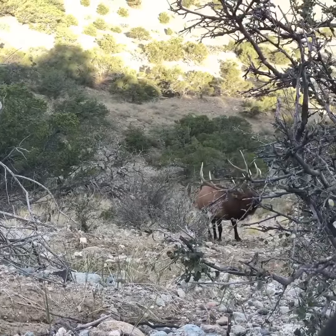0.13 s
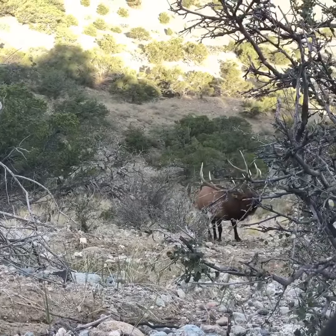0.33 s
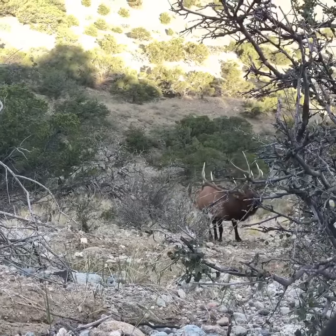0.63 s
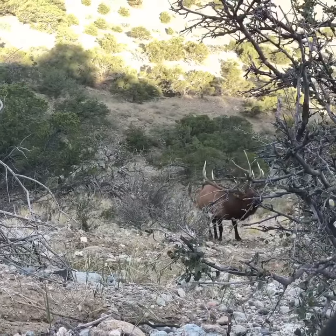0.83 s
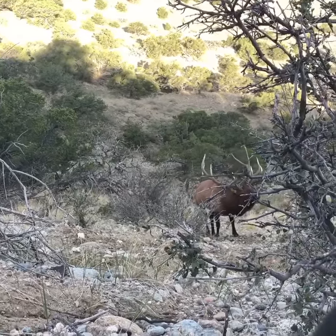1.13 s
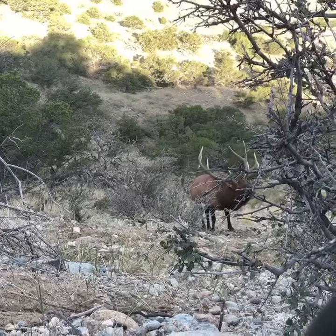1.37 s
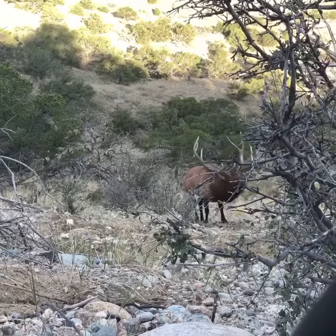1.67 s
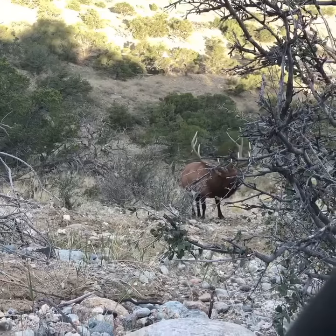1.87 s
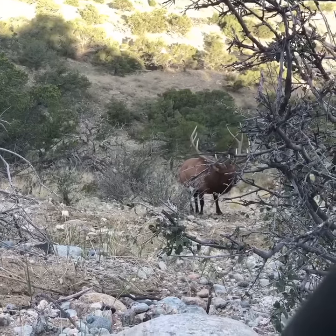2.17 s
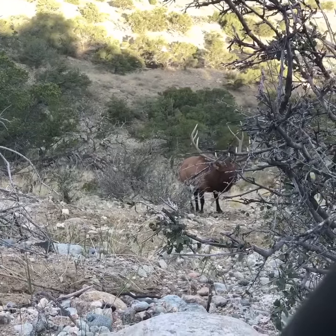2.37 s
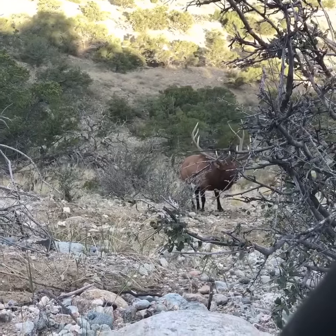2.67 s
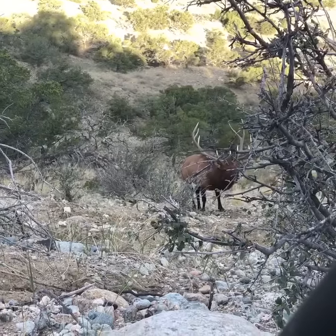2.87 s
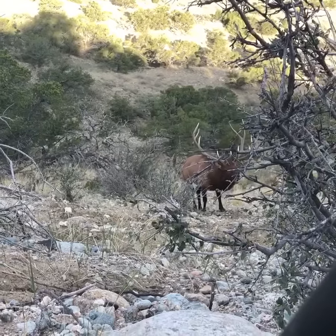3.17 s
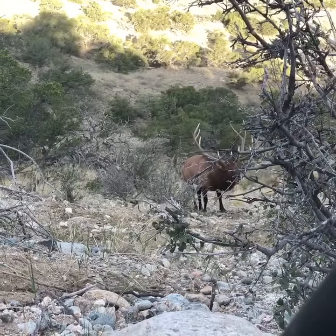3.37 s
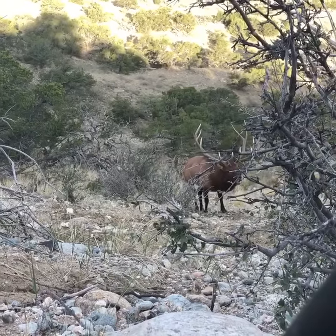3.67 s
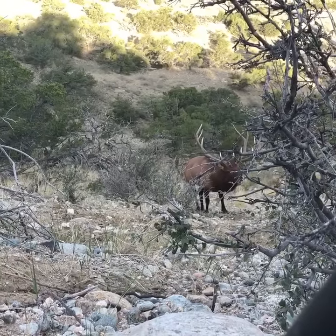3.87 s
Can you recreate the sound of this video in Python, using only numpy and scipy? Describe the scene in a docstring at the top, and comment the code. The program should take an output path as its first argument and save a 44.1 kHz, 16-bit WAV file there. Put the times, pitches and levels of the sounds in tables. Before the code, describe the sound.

Outdoors, the shrill bugle of a bull elk falls steeply into a low, breathy grunt and echoes faintly off the hillsides. Afterwards only light wind rumble on the microphone and small ticks and rustles remain.

```python
"""On a brushy slope, a bull elk ends his bugle. Two whistles sound together, mix into sum and
difference tones and plunge in pitch, while a low, hoarse grunt of throat pulses and breath comes
up under them. The hillsides answer with faint echoes. Then only puffs of wind on the microphone,
a few small ticks and rustles and the quiet air are left."""
import sys
import numpy as np
from scipy import signal
from scipy.fft import rfft, irfft, next_fast_len
from scipy.io import wavfile
from scipy.ndimage import map_coordinates

SR = 44100
rng = np.random.default_rng(int(sys.argv[2]) if len(sys.argv) > 2 else 0)


def generate_wav(signal):
    """Clip the signal to [-1, 1] and save it as 16-bit WAV at the path in sys.argv[1]."""
    frames = np.transpose(np.atleast_2d(signal))
    scaled = np.clip(frames, -1, 1) * 32767
    pcm = np.round(scaled).astype(np.int16)
    wavfile.write(sys.argv[1], SR, pcm)


N = 176400  # 4 seconds

# The two whistles: (time [s], pitch [Hz], level [dB])
LOWER_WHISTLE = [(0, 2147, -21), (.05, 2137, -22), (.14, 2131, -22), (.2, 2110, -23), (.26, 2078, -24),
                 (.28, 2040, -27), (.295, 1988, -34), (.302, 1968, -24), (.31, 1950, -19),
                 (.322, 1905, -18), (.331, 1865, -21), (.337, 1800, -29), (.344, 1680, -33),
                 (.351, 1560, -22), (.359, 1350, -40), (.365, 1190, -28), (.373, 1030, -45),
                 (.39, 800, -90)]
UPPER_WHISTLE = [(0, 2480, -54), (.135, 2496, -47), (.148, 2494, -43), (.157, 2490, -34), (.2, 2474, -29),
                 (.26, 2420, -26), (.285, 2406, -25), (.3, 2381, -24), (.31, 2322, -27), (.32, 2240, -26),
                 (.331, 2160, -29), (.337, 2060, -29), (.341, 1960, -30), (.345, 1890, -18),
                 (.35, 1800, -28), (.358, 1555, -24), (.363, 1500, -30), (.37, 1330, -44),
                 (.384, 1035, -36), (.39, 860, -46), (.396, 700, -31), (.4, 480, -42), (.406, 340, -29),
                 (.413, 280, -38), (.42, 225, -34), (.43, 170, -48), (.45, 150, -90)]
# Tones made as the whistles mix: (multiple of lower pitch, multiple of upper pitch, level [dB],
# rise with the lower's level [dB per dB], rise with the upper's level [dB per dB])
MIXED_TONES = [(-1, 2, -37, .1, 1.15), (-2, 3, -52, .1, 1.5), (2, -1, -49, .2, 1.1), (2, 0, -47, .6, -.08),
               (1, 1, -42, -.3, 1.4), (3, -1, -55, .3, .5), (3, 0, -61, .3, 0), (2, 1, -54, -.2, 1.1),
               (1, 2, -65, -.4, 2.2), (0, 2, -60, 0, 1.2), (-2, 2, -53, .9, 1.4), (-1, 1, -62, .3, 2.2),
               (-3, 3, -62, .3, 1.5), (4, -2, -64, .3, .9), (-1, 3, -62, .6, 1.3), (5, 0, -82, .5, 0)]
# The grunt: (time [s], pitch [Hz], voice level [dB], breath level [dB])
GRUNT_SHAPE = [(0, 140.1, -88, -57), (.14, 139.8, -87, -67.5), (.2, 139.5, -80, -60.5),
               (.272, 139.3, -76, -57.5), (.285, 140.3, -59.5, -43.5), (.32, 137.3, -50, -38),
               (.355, 140.1, -38.5, -36.5), (.385, 113.5, -42, -34.5), (.41, 98.96, -49.5, -39),
               (.43, 87.7, -62.5, -41.5), (.46, 86.04, -70, -52), (.49, 80.64, -90, -72),
               (.53, 80, -99, -92.5)]
# Where the throat and nose ring: (frequency [Hz], width [Hz], gain [dB])
THROAT_RESONANCES = [(199.9, 132, -13), (334, 50, -4), (605, 35, -2.5), (707, 19, 3), (1050, 60, -3.5),
                     (1375, 40, -4.5), (1547.6, 28, -3), (1913, 45, -2), (2265, 110, -7), (2477, 120, -5),
                     (2860, 140, -8.5), (3245, 100, -12), (3584, 38, -14.5), (4346, 400, -23.5),
                     (6700, 460, -29)]
# Faint, smeared repeats of the call, mostly the hoarse grunt with only a trace of whistle:
# (delay [s], smear [s], grunt gain [dB], whistle gain [dB])
HILL_ECHOES = [(.05, 0.049, -26, -47), (.2, 0.1045, -28, -55), (.35, .05, -28.5, -60.5),
               (.615, 0.022, -30, -63), (.92, 0.096, -38, -75)]
# Strength of the wind's rumble: (time [s], level [dB])
WIND_LEVELS = [(0.5, -74.5), (0.71, -84), (1.39, -73.5), (1.5, -92), (1.53, -72), (1.65, -67), (1.77, -57),
               (1.91, -58), (1.94, -63), (1.97, -58), (2.08, -60), (2.1, -62), (2.15, -53.5), (2.34, -69),
               (2.72, -58), (2.75, -49), (2.79, -70), (2.97, -69), (2.99, -57.5), (3.21, -66.5),
               (3.24, -64.5), (3.3, -73), (3.35, -67), (3.78, -70), (3.8, -84), (4.0, -65.5)]
# Tone colour of that rumble: (frequency [Hz], relative level [dB])
WIND_SPECTRUM = [(12, -45), (20, -8.5), (43, 3), (73, -1), (259, -24.5), (349, -29.5), (386, -27),
                 (600, -32.5), (780, -61), (1320, -120)]
# Single puffs on the microphone: (time [s], peak level [dB], pitch [Hz])
WIND_PUFFS = [(2.674, -50, 70), (2.726, -55, 69), (2.746, -43.5, 69.6), (2.999, -52, 70),
              (3.089, -53, 70.5)]
# Small ticks in the brush: (time [s], level [dB], pitch [Hz])
BRUSH_TICKS = [(.6, -63, 6200), (1.645, -63, 6200), (2.692, -59, 6400), (2.817, -65, 2000),
               (2.852, -61, 1300), (3.31, -65, 1350), (3.472, -60, 2940), (3.499, -60, 1050),
               (3.522, -63, 2570), (3.578, -61, 2350), (3.739, -60, 6530), (3.896, -59, 2300)]
# Two rustles and a faint stir between them: (start [s], length [s], level [dB])
BRUSH_RUSTLES = [(3.89, 0.022, -67), (3.92, .04, -80), (3.948, 0.019, -69)]
# Tone colour of the background hiss: (frequency [Hz], relative level [dB])
AIR_SPECTRUM = [(35, -32.5), (60, -5), (86, -4.5), (136, -7.5), (202, -6.5), (360, -11.5), (628, -15.5),
                (1000, -18.5), (1910, -22.5), (3500, -25.5), (6500, -26), (8000, -27), (11000, -29.5),
                (14500, -33.5), (15700, -42)]


def whistles():
    """Two wavering tones in a haze of noise, with their mixed tones and air hissing past them."""
    wander_hz, haze_db, haze_hz, rasp_db, rasp_hz = 4, -25.5, 380, -73.5, 5500
    plunge_s, ring_db, direct_drop_db = .325, 4, 6
    t = np.arange(N) / SR
    low_hz, low_db = curves(LOWER_WHISTLE)
    up_hz, up_db = curves(UPPER_WHISTLE)
    low_phase = 2 * np.pi * np.cumsum(low_hz + wander_hz * wobble(60)) / SR
    up_phase = 2 * np.pi * np.cumsum(up_hz + wander_hz * wobble(60)) / SR
    tones = amp(low_db + .35 * wobble(45)) * np.sin(low_phase)
    tones += amp(up_db + 1.05 * wobble(45)) * np.sin(up_phase)
    haze = amp(haze_db) * unit(filtered(noise(), lambda f: 1 / (1 + (f / haze_hz) ** 4)))
    # As the pitch plunges, the plain tones weaken and the throat rings more.
    plunge = np.clip((t - plunge_s) / .02, 0, 1)
    direct = tones * amp(-direct_drop_db * plunge) * (1 + .2 * haze)
    ringing = filtered(tones * (3 * haze + amp(ring_db) * plunge), throat)
    mixed = mixed_tones(low_phase, up_phase, low_db, up_db)
    rasp = unit(filtered(noise(), lambda f: 1 / (1 + (rasp_hz / (f + 1)) ** 4)))
    rasp *= amp(rasp_db + 1.9 * wobble(30))
    fade = np.clip((.345 - t) / .012, 0, 1)  # mixed tones and rasp are gone by 0.345 s
    return np.sqrt(2) * (direct + ringing + fade * mixed) + fade * rasp


def mixed_tones(low_phase, up_phase, low_db, up_db):
    """The whistles mix into new tones at sums and differences of multiples of their pitches."""
    low_usual_db, up_usual_db, break_s = -23, -26, .3
    t, out = np.arange(N) / SR, np.zeros(N)
    roughness = .28 + 1.6 * np.clip((t - break_s) / .02, 0, 1)
    for low_times, up_times, db, low_follow, up_follow in MIXED_TONES:
        level_db = db + low_follow * (low_db - low_usual_db) + up_follow * (up_db - up_usual_db)
        tone = amp(level_db + 1.5 * wobble(49.25)) * np.sin(low_times * low_phase + up_times * up_phase)
        out += tone * (1 + roughness * wobble(500)) / np.sqrt(1 + roughness ** 2)
    return out


def grunt():
    """Uneven pulses from the vocal folds and pulsing breath ring in the throat; a little hiss escapes."""
    jitter, dull_above_hz, overtones_db, octave_db, hiss_db, hiss_hz = .04, 264, -5.5, -11, -25.5, 6000
    hz, voice_db, breath_db = curves(GRUNT_SHAPE)
    cycles = np.cumsum(hz * (1 + jitter * wobble(130))) / SR
    phase = 2 * np.pi * cycles
    pulses = np.diff(np.floor(cycles), prepend=0) * amp(2.4 * wobble(110))  # one click per cycle
    overtones = unit(filtered(pulses, lambda f: throat(f) / (1 + 1j * f / dull_above_hz)))
    hum = np.sqrt(2) * (np.sin(phase) + amp(octave_db) * np.sin(2 * phase))
    voice = amp(voice_db) * (hum + amp(overtones_db) * overtones)
    breath = amp(breath_db) * noise() * (1 + .527 * np.cos(phase))
    throat_gain = np.std(filtered(noise(), throat))
    hiss = amp(hiss_db) * filtered(breath, lambda f: f / (f + hiss_hz))
    return voice + filtered(breath, throat) / throat_gain + hiss


def throat(f):
    """How the throat and nose pass each frequency f: best near the ones they ring at."""
    return sum((-1) ** k * amp(db) * 1j * f * width / (hz * hz - f * f + 1j * f * width)
               for k, (hz, width, db) in enumerate(THROAT_RESONANCES))


def hill_echoes(grunt_sound, whistle_sound):
    """Each slope sends back a late, smeared, dull copy of the call."""
    scatter_hz, dull_above_hz = 150, 3300
    t, out = np.arange(2 * SR) / SR, np.zeros(N)
    for delay, smear, grunt_db, whistle_db in HILL_ECHOES:
        age = np.clip(t - delay, 0, None) / smear
        tail = rng.standard_normal(len(t)) * age * np.exp(-2.5 * age)
        call = amp(grunt_db) * grunt_sound + amp(whistle_db) * whistle_sound
        out += signal.fftconvolve(call * wobble(scatter_hz), tail / np.linalg.norm(tail))[:N]
    return filtered(out, lambda f: 1 / (1 + (f / dull_above_hz) ** 3))


def wind():
    """Wind buffets the microphone: a lumpy low rumble with a few single puffs."""
    t = np.arange(N) / SR
    level_db, = curves(WIND_LEVELS)
    lumps = amp(2.5 * wobble(22))
    out = amp(level_db) * unit(lumps * coloured_noise(WIND_SPECTRUM))
    for time, db, hz in WIND_PUFFS:
        cycles = (t - time) * hz - .3
        out -= amp(db) * np.cos(2 * np.pi * cycles) * np.exp(-(1.9 * cycles) ** 2)
    return out


def brush():
    """Ticks that die away in a few cycles, and two dry rustles of grainy noise nearby."""
    ring_cycles, rustle_hz = 5, 1900
    t, ticks = np.arange(N) / SR, np.zeros(N)
    for time, db, hz in BRUSH_TICKS:
        cycles = np.clip(t - time, 0, 1) * hz
        ticks += amp(db) * np.sin(2 * np.pi * cycles) * np.exp(-3 * cycles / ring_cycles)
    swells = sum(amp(db) * np.exp(-(2 * (t - start) / length - 1) ** 2)
                 for start, length, db in BRUSH_RUSTLES)
    grains = noise() * amp(3 * wobble(400))
    rustle = unit(filtered(grains, lambda f: f / (f + 500) / (1 + (f / rustle_hz) ** 2.6)))
    return ticks + swells * rustle


def air():
    """The quiet of open country and the microphone's own hiss."""
    level_db = -71 + .7 * wobble(3.2) + .27 * wobble(10.766)
    return amp(level_db) * coloured_noise(AIR_SPECTRUM)


def amp(db):
    """Turn decibels into a number to multiply by."""
    return 10 ** (np.asarray(db) / 20)


def unit(x):
    """Scale a sound to an average strength (rms) of 1."""
    return x / np.sqrt(np.mean(x ** 2) + 1e-20)


def curves(rows):
    """Join a table's points with straight lines: one curve for each column after the time."""
    times, *columns = np.transpose(rows)
    return [np.interp(np.arange(N) / SR, times, column) for column in columns]


def wobble(rate):
    """A smooth curve through `rate` random values a second."""
    return map_coordinates(rng.standard_normal(int(N * rate / SR) + 4), [np.arange(N) * rate / SR])


def filtered(x, response):
    """Multiply each frequency f in a sound by response(f)."""
    size = next_fast_len(N + SR // 2)
    return irfft(rfft(x, size) * response(np.fft.rfftfreq(size, 1 / SR)), size)[:N]


def noise():
    """White noise: an even hiss."""
    return rng.standard_normal(N)


def coloured_noise(spectrum):
    """Noise of strength 1, shaped by rows of (frequency [Hz], relative level [dB])."""
    hz, db = np.transpose(spectrum)
    return unit(filtered(noise(), lambda f: amp(np.interp(np.log(f + 1), np.log(hz + 1), db))))


def scene():
    """The elk, its echoes and the surroundings, in one channel."""
    whistle_sound, grunt_sound = whistles(), grunt()
    echoes = hill_echoes(grunt_sound, whistle_sound)
    return (whistle_sound + grunt_sound + echoes + wind() + brush() + air())[None]


def record(dry):
    """The camera thins the deepest bass and cuts off the highest treble."""
    bass_hz, top_hz = 38, 15750
    return filtered(dry[0], lambda f: (f < top_hz) / (1 + (bass_hz / (f + 1)) ** 3))[None]


dry = scene()
out = record(dry)
generate_wav(out)
```